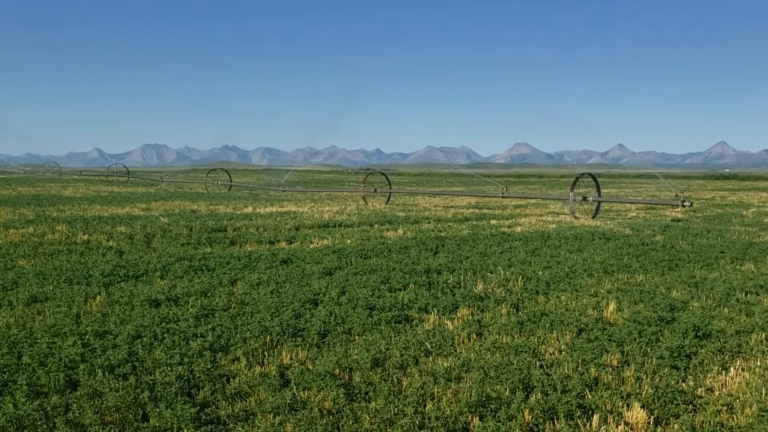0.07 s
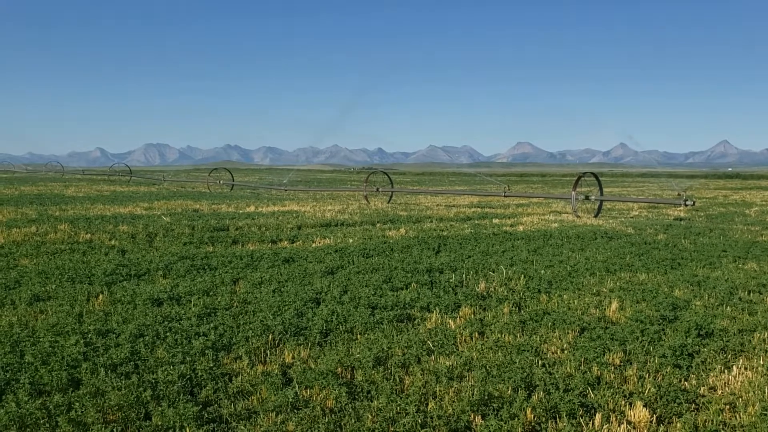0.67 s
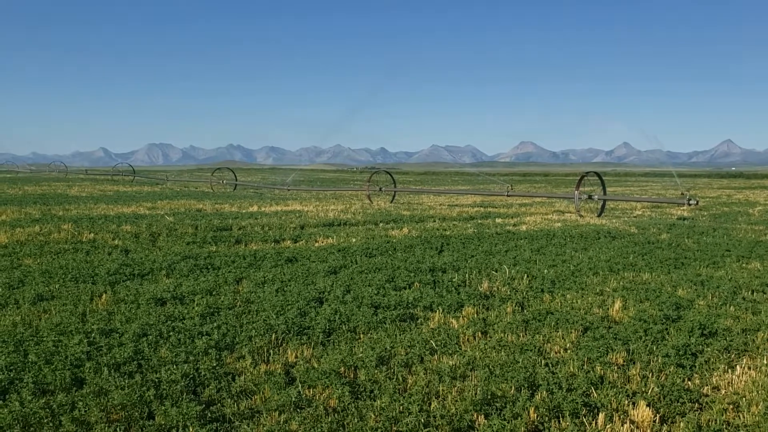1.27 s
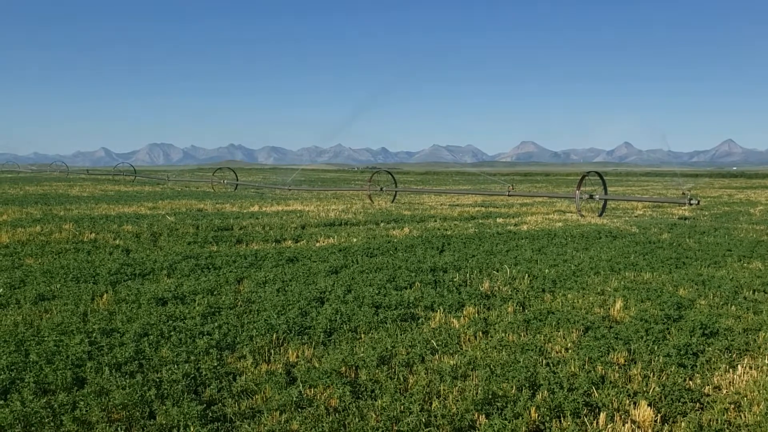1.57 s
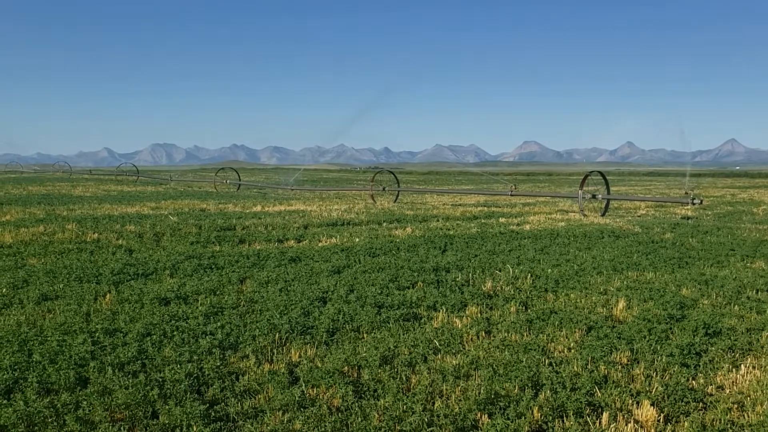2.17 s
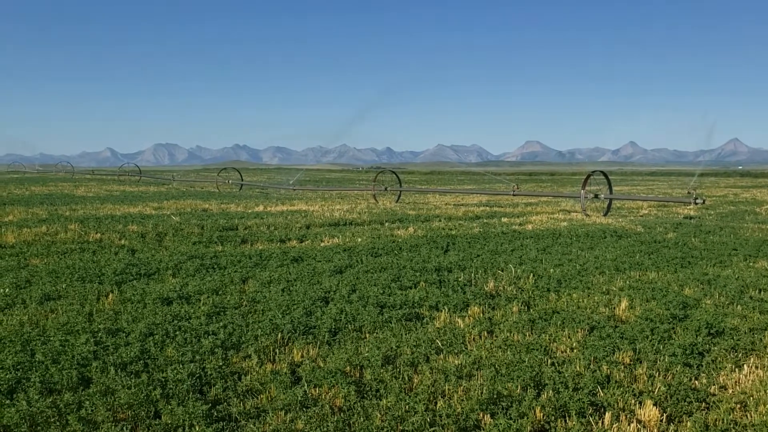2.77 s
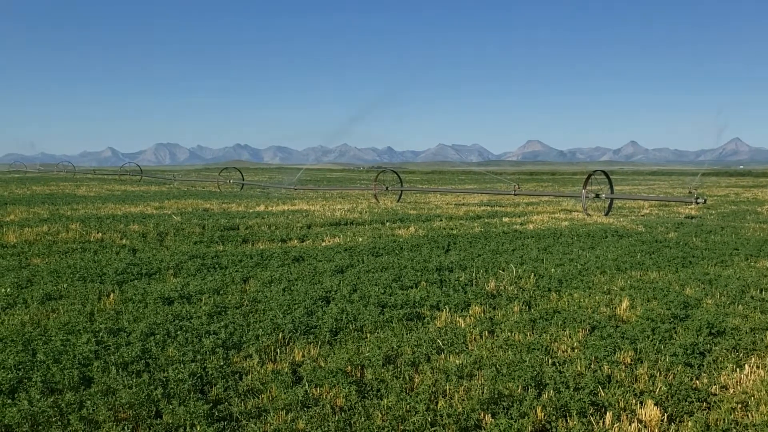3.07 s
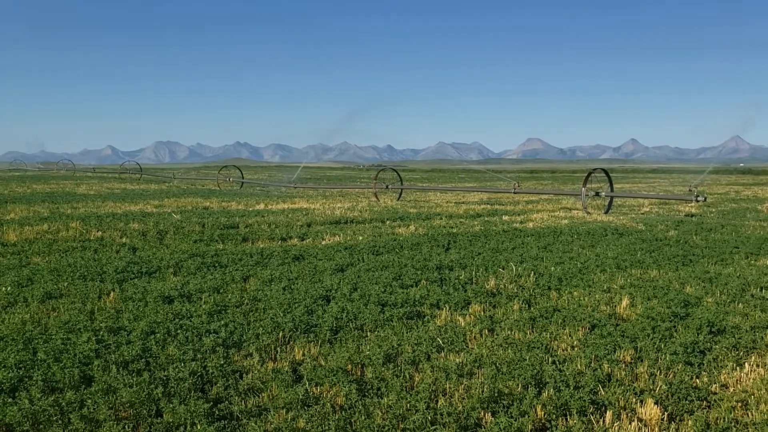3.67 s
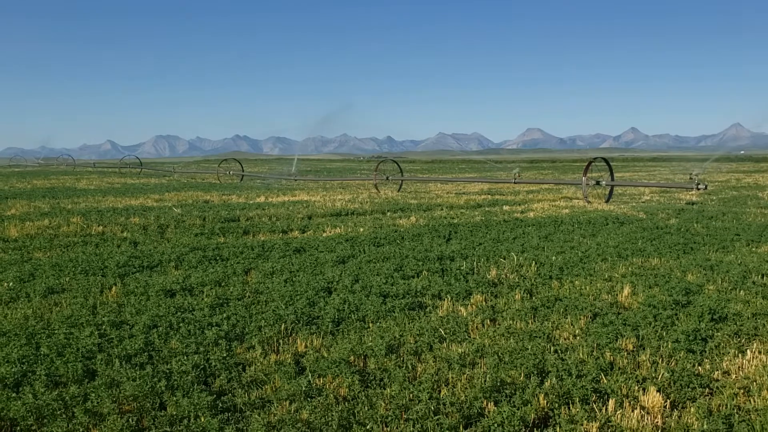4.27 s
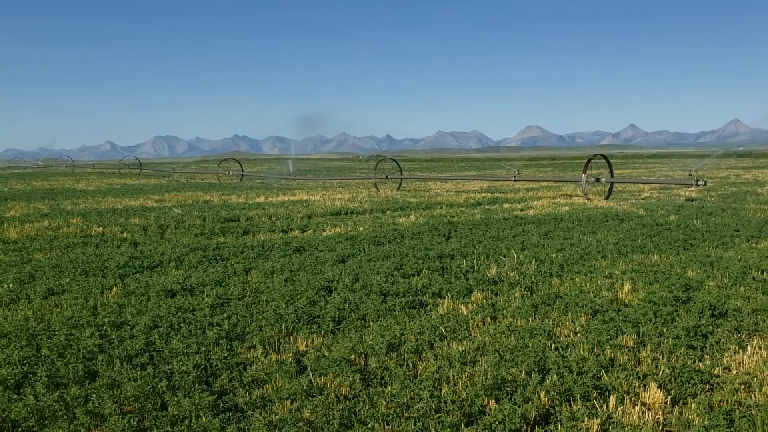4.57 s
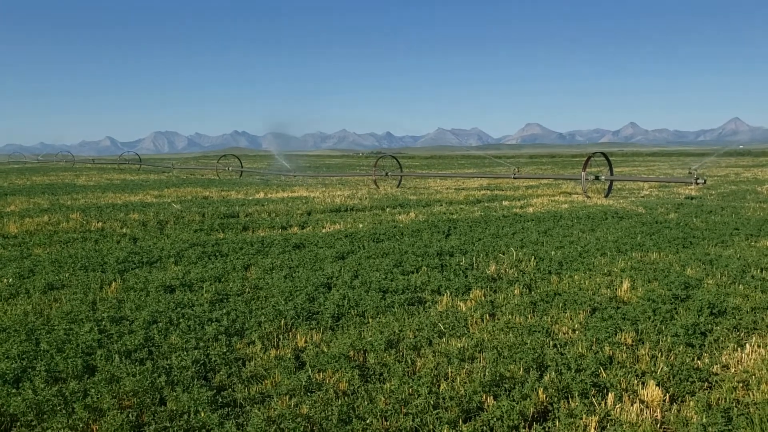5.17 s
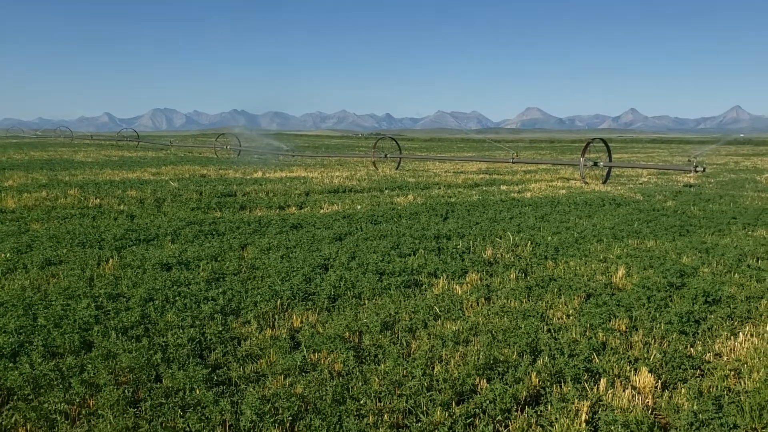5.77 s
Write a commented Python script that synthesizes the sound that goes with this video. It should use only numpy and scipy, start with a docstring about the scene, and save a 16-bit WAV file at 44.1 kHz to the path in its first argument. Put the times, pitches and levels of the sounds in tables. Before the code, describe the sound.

Impact sprinklers tick and spurt rapidly in overlapping rhythms across an open field, with a few light handling bumps.

```python
"""Five impact sprinklers spurt and tick along a wheel line in an open field, each at its own pace.
Each arm ticks as it enters its jet, which bursts into spray; pressure pulses ring the hollow feed pipe.
Behind them drops hiss down, a pump hums and a far bird whistles.
Later a finger knocks and rubs beside the right microphone port and light gusts buffet the camera."""
import sys
import numpy as np
from scipy import signal
from scipy.fft import rfft, irfft, next_fast_len
from scipy.io import wavfile
from scipy.ndimage import uniform_filter1d, map_coordinates

SR = 44100
rng = np.random.default_rng(int(sys.argv[2]) if len(sys.argv) > 2 else 0)


def materialize(psi):
    """Save the field psi as 16-bit PCM at rate SR to the path in sys.argv[1].

    A 1-D psi becomes a single channel; in a 2-D psi each row is a channel.
    """
    bounded = np.clip(np.atleast_2d(psi).T, -1, 1)
    quanta = np.round(bounded * 32767).astype(np.int16)
    wavfile.write(sys.argv[1], SR, quanta)


N = 261072

# Arm beat per head, nearest first: start_s, period_s
ARM_BEATS = [(.025, .2268), (.03, .2868), (.04, .26), (.015, .19), (.12, .2917)]
# Spurt and tick per head, relative levels:
# hiss_db, delay_s, rise_s, hold_s, tail_t60_s, nozzle_offset_db, tick_db, lean_db
SPRINKLER_HEADS = [(-42, 0.0036, 0.0072, 0.024, 0.075, -11.5, -45, -8),
                   (-46, .001, 0.0017, 0.028, 0.034, -11.5, -47.5, -5.5),
                   (-53, .001, 0.0016, .015, 0.086, -3.5, -42.5, -2),
                   (-54, 0.00052, 0.001, 0.017, 0.11, -2, -61, -5),
                   (-56, 0.00046, 0.00089, 0.021, 0.081, -6, -55, -2)]


def amp(db):
    """Decibels to gain."""
    return 10 ** (np.asarray(db) / 20)


def unit(x):
    """Scale to rms 1."""
    return x / np.sqrt(np.mean(x ** 2) + 1e-20)


def gain_at(spectrum, hz):
    """Gain from (freq_hz, level_db) points on a log frequency axis."""
    freq_hz, level_db = np.transpose(spectrum)
    return amp(np.interp(np.log(hz + 1), np.log(freq_hz + 1), level_db))


def clock():
    """Sample times in seconds."""
    return np.arange(N) / SR


def wobble(rate_hz):
    """Smooth random curve, rate_hz knots a second."""
    knots = rng.standard_normal(int(N * rate_hz / SR) + 4)
    return map_coordinates(knots, [np.arange(N) * rate_hz / SR])


def filtered(x, response):
    """Apply a frequency response."""
    size = next_fast_len(N + 8192)
    return irfft(rfft(x, size) * response(np.fft.rfftfreq(size, 1 / SR)), size)[..., :N]


def noise(spectrum):
    """Independent left and right shaped noise, rms 1."""
    return unit(filtered(rng.standard_normal((2, N)), lambda hz: gain_at(spectrum, hz)))


def ringing(size, hz, q):
    """Stereo noise in one resonance, rms 1."""
    resonance = signal.iirpeak(min(hz, SR / 3), max(q, .8), SR)
    return unit(signal.lfilter(*resonance, rng.standard_normal((2, size))))


def ports(x):
    """Each microphone port colours the treble its own way; rms 1."""
    # Port responses: freq_hz, gain_db
    left = [(1000, -8), (1750, -11), (2100, -9), (2550, 6), (2800, -20), (3200, 2.5), (4050, -24.5),
            (4600, -5.5), (5650, 6.5), (8000, 1.5), (10400, -8.5), (11400, 4.5), (12800, -2), (15500, 1)]
    right = [(1000, -4), (1750, -9.5), (2100, -6.5), (2800, 3), (4300, -10), (5100, -4), (6400, 3),
             (7800, 14.5), (8600, 0), (10400, 0), (12200, 2.5), (13600, 5), (14700, -24), (15700, 8.5)]
    return unit(filtered(x, lambda hz: np.array([gain_at(left, hz), gain_at(right, hz)])))


def pan(lean_db):
    """Stereo gains of mean power 1; lean_db is left over right."""
    return unit(amp([[lean_db / 2], [-lean_db / 2]]))


def add(track, start_s, sound):
    """Mix a sound in at start_s."""
    span = track[:, round(start_s * SR):][:, :sound.shape[-1]]
    span += sound[..., :span.shape[1]]


def pump(rumble_db=-69.0):
    """A pump's steady low orders over the rumble of the open field."""
    # Pump orders: pitch_hz, level_db
    orders = [(48.45, -60.5), (96.9, -57.5), (145.35, -79)]
    # Field rumble spectrum: freq_hz, density_db
    field = [(20, -22), (45, -10.5), (70, -3), (140, -8.5), (190, -16), (300, -23), (420, -33.5),
             (800, -26), (2000, -55)]
    drift_s = .00025 * wobble(3)
    t = clock() + drift_s
    hum = sum(amp(db + 0.62 * wobble(4.8)) * np.sqrt(2) * np.sin(2 * np.pi * hz * t)
              for hz, db in orders)
    air = noise(field)
    return pan(lean_db=-7) * hum + pan(lean_db=-4) * amp(rumble_db) * (air + 0.3 * air[::-1])


def wind():
    """Light gusts buffet the two ports unequally."""
    # Gusts: peak_s, sigma_s, level_db
    gusts = [(3.42, 0.023, -63), (3.81, 0.1, -63), (5.85, 0.12, -53)]
    # Buffeting spectrum: freq_hz, density_db
    buffet = [(20, -21), (60, 4), (150, -12.5), (280, -11), (600, -26), (2000, -65)]
    strength = sum(amp(db) * np.exp(-.5 * ((clock() - peak_s) / sigma_s) ** 2)
                   for peak_s, sigma_s, db in gusts)
    lumps = amp(4 * wobble(30))
    return strength * lumps * pan(lean_db=-6) * noise(buffet)


def bird(gain_db=4.0, arch_hz=210, waver_hz=22, blur=0.7):
    """Thin whistles arch in pitch and level, a little blurred by distance."""
    # Two whistles and a chirp: start_s, length_s, top_hz, relative_db
    whistles = [(0.549, 0.31, 3230, -74), (1.405, 0.42, 3340, -72), (2.677, 0.057, 3170, -69)]
    pitch_hz, level = np.zeros(N), np.zeros(N)
    for start_s, length_s, top_hz, db in whistles:
        progress = np.clip((clock() - start_s) / length_s, 0, 1)
        arch = np.sqrt(abs(np.sin(np.pi * progress ** 0.59)))  # up quickly, down slowly
        pitch_hz = np.where(clock() >= start_s, top_hz - arch_hz * (1 - arch), pitch_hz)
        level += amp(db + gain_db) * arch
    phase = 2 * np.pi * np.cumsum(pitch_hz + waver_hz * wobble(23)) / SR
    scatter = wobble(240) * np.sin(phase) + wobble(240) * np.cos(phase)
    fading = amp(1.5 * wobble(22))
    return level * fading * (np.sin(phase) + blur * scatter)


def falling_spray(patter_gain_db=1, flow_db=-68):
    """Drops patter on the crop while water rushes through the pipe."""
    # Patter swell: time_s, relative_db
    swell = [(0, -66), (2, -66), (3.6, -63.5), (4.3, -61.5), (4.7, -61.5), (5.9, -62.5)]
    # Patter spectrum: freq_hz, density_db
    drops = [(300, 2.5), (800, -9), (1100, -24), (2000, 2), (3200, 0.5), (4500, 2.5), (8000, -5),
             (12000, 5.5), (16000, -11)]
    patter_db = np.interp(clock(), *np.transpose(swell)) + patter_gain_db
    patter = amp(patter_db + wobble(8.3) + 1.9 * wobble(400)) * ports(noise(drops))
    flow = noise([(600, -53), (900, -5), (1110, 8.5), (1350, -6.5),
                  (1600, 6), (1850, 5.5), (2100, -28.5), (4000, -14)])
    return patter + amp(flow_db + wobble(6.4)) * pan(lean_db=-8.5) * flow


def rubs(scrape_gain_db=-3, hollow_gain_db=-2.33, grain_db=0.93):
    """Skin slides on the case: a grainy scrape, and the hollow under the finger rings."""
    # Finger slides: peak_s, sigma_s, relative_db, hollow_hz, scrape_offset_db
    slides = [(3.374, 0.022, -48.5, 457, 3), (3.446, 0.025, -40.5, 780, -6),
              (3.533, 0.017, -54.5, 594, -15), (3.672, 0.046, -54, 660, -2.5), (3.792, 0.025, -42, 597, -7),
              (3.897, 0.055, -63, 690, 7), (4.756, 0.013, -68.5, 444, 15), (4.853, 0.03, -45, 605, -4),
              (4.954, 0.031, -47.5, 630, 0), (5.181, 0.033, -53.5, 515, 0), (5.478, .029, -46, 500, 1),
              (5.606, .036, -39, 586, -4), (5.69, 0.022, -50, 680, 6.5), (5.746, 0.023, -37, 680, .5),
              (5.839, 0.035, -53.5, 403, 4), (5.914, 0.012, -40, 470, 6)]
    # Scrape spectrum: freq_hz, density_db
    rasp = [(60, -20), (200, -1.5), (400, -5), (900, -11), (1550, -4), (2300, -10.5), (2900, -9.5),
            (4000, -11), (5000, -11.5), (6400, -20), (7700, -12.5), (9500, -25), (12000, -14), (15500, -16)]
    hollows, scraping, t = np.zeros((2, N)), np.zeros((1, N)), np.arange(SR // 2) / SR
    case = signal.butter(2, [250, 1300], "bandpass", fs=SR)
    for peak_s, sigma_s, db, hollow_hz, scrape_offset_db in slides:
        envelope = amp(db) * np.exp(-.5 * ((t - t.mean()) / sigma_s) ** 2)
        ring = unit(signal.lfilter(*case, ringing(len(t), hollow_hz, q=2.2)))
        add(hollows, peak_s - t.mean(), envelope * ring)
        add(scraping, peak_s - t.mean(), envelope * amp(scrape_offset_db))
    scrape = amp(scrape_gain_db) * pan(lean_db=-15.5) * scraping * noise(rasp)
    hollow = amp(hollow_gain_db) * pan(lean_db=-52) * hollows
    return (scrape + hollow) * amp(grain_db * wobble(350) + wobble(60))


def knocks(crack_t60_s=0.0032, thump_hz=62, thump_db=-42, thump_t60_s=0.24):
    """Small dead knocks by the right port; the first firm one shakes the whole camera."""
    # Finger contacts: start_s, body_db, body_hz, decay_s, crack_db, crack_hz
    contacts = [(3.326, -48, 8200, 0.002, -36, 9000), (3.3337, -37, 5100, 0.0047, -32, 7000),
                (3.3353, -26, 332, 0.0019, -25.5, 5960), (3.3679, -20.5, 796, 0.0023, -29.5, 2200),
                (3.866, -40.5, 2240, 0.0015, -42.5, 3000), (5.322, -52, 4960, 0.0025, -42, 7000),
                (5.801, -31, 200, 0.0078, -52, 1000)]
    out, t = np.zeros((2, N)), np.arange(SR // 5) / SR
    for start_s, body_db, body_hz, decay_s, crack_db, crack_hz in contacts:
        age = np.log(1000) * t / decay_s
        push = age * np.exp(1 - age)  # soft contact: swells, then dies at once
        body = amp(body_db) * push * np.sin(2 * np.pi * body_hz * t)
        crack = amp(crack_db - 60 * t / crack_t60_s) * ringing(len(t), crack_hz, q=0.8)
        add(out, start_s, pan(lean_db=-21) * (body + crack))
    thump = amp(thump_db - 60 * t / thump_t60_s) * np.sin(2 * np.pi * thump_hz * t)
    add(out, contacts[2][0], thump)
    return out


def strokes(head):
    """Times in seconds at which one head's arm cuts its jet."""
    # Slow drift around the beat: time_s, then late_ms for heads 0-4
    drift = [(0, -6.5, -7.5, -0.2, -2.5, -4), (0.978, 2.1, -1, -.5, 7.5, 2.5), (1.97, 5, 7, -3.3, 9, 9),
             (2.948, 4.5, 1, -1.9, 9.5, -4), (3.931, 1, 9, -3, 5, -4), (4.921, -2.1, -10.5, -9, -9.5, 4),
             (5.9, -7, -22.5, -10, -27, 3)]
    time_s, *late_ms = np.transpose(drift)
    start_s, period_s = ARM_BEATS[head]
    beat_s = np.arange(start_s, N / SR, period_s)
    return beat_s + np.interp(beat_s, time_s, late_ms[head]) / 1000


def pipe(head=1, delay_s=0.0032, rise_s=0.013, t60_s=0.42, upper_hz=1720, lower_hz=1130, gain_db=2):
    """Each pressure pulse from one head rings two broad pipe resonances: a hollow chuff."""
    # Strongest chuffs: start_s, relative_db, upper_hz
    hard = [(.031, -66, 1590), (0.324, -65.5, 1820), (2.63, -68.5, 1810), (4.07, -64, 1750),
            (4.61, -68.5, 1730)]
    out, t = np.zeros((2, N)), np.arange(SR // 2) / SR
    usual_relative_db, half_beat_s = -69, ARM_BEATS[head][1] / 2
    usual = [(s + delay_s, usual_relative_db, upper_hz * rng.normal(1, 0.031)) for s in strokes(head)
             if all(abs(s - hard_s) > half_beat_s for hard_s, *_ in hard)]
    for start_s, db, hz in hard + usual:
        body = ringing(len(t), hz, q=7.1) + amp(-3) * ringing(len(t), lower_hz, q=12)
        envelope = amp(db + gain_db - 60 * t / t60_s) * (1 - np.exp(-t / rise_s))
        add(out, start_s, envelope * body)
    walls = [(500, -18), (850, 2.5), (1050, 3.5), (1900, 13), (2100, 4.5), (4000, 21)]
    return pan(lean_db=-7.5) * filtered(out, lambda hz: gain_at(walls, hz))


def slaps(t60_s=0.012, scatter_db=2.7, entry_s=0.001, drop_db=-58, drops_per_s=70):
    """Bright ticks: each arm ticks as it enters the jet, some much harder than the rest, and flung drops hit
    the pipe."""
    # Loudest arm-entry ticks, at set times: start_s, peak_db
    hard = [(.0427, -36), (.823, -43), (2.7501, -33.5), (2.9807, -39), (4.0596, -40), (4.113, -48)]
    strikes, t = np.zeros((2, N)), np.arange(SR // 20) / SR
    tick = amp(-60 * t / t60_s)
    for start_s, peak_db in hard:
        add(strikes, start_s, amp(peak_db) * tick)
    for head, (*_, tick_db, lean_db) in enumerate(SPRINKLER_HEADS):
        for start_s in strokes(head) + entry_s:
            strength = amp(tick_db + scatter_db * rng.standard_normal())
            add(strikes, start_s, strength * pan(lean_db) * tick)
    for when, size, side in rng.random((int(drops_per_s * N / SR), 3)):
        add(strikes, when * N / SR, amp(drop_db + 12 * size) * pan(12 * side - 7) * tick ** 4)
    return strikes * ports(noise([(1000, -11.5), (2500, -1), (5000, 1.5), (9000, 14), (16000, 10)]))


def patchy_colour(x, depth_db):
    """Each spurt's hiss has a slightly different, patchy colour."""
    spectra = signal.stft(x, nperseg=512)[2]
    patches = uniform_filter1d(rng.standard_normal(spectra.shape), size=7, axis=1)
    patches = uniform_filter1d(patches, size=12, axis=2)
    return signal.istft(spectra * amp(depth_db * unit(patches)), nperseg=512)[1][:, :N]


def spurts(scatter_db=1.05, soften_db=-2, colour_db=1.55, flutter_db=1.63,
           nozzle_gain_db=1.5, tsk_gain_db=5):
    """The jet bursts on the arm, holds while the arm is in it, and trails off as droplets."""
    # Spray, nozzle band and narrow "tsk" spectra: freq_hz, density_db
    hiss_band = [(3000, -22), (5500, -3.5), (6600, -6), (10000, 6.5), (16000, -1.5)]
    nozzle_band = [(300, -50), (800, -22), (1100, 3.5), (2000, -9), (3200, -2), (4200, 4.5), (5000, 3),
                   (6000, -0.5), (7000, -2.5), (10000, -59)]
    tsk_band = [(3900, -35), (4600, -4), (5000, 0), (5650, -2.5), (6200, -29), (7500, -32)]
    # Nearest head swinging round: time_s, gain_db, facing (0-1)
    swing = [(0, -0.5, 0), (.7, -3, 0.04), (1.4, 2, 0.09), (2.3, 0.5, 0.07), (2.9, 1.5, 0), (3.6, 1, 0.57),
             (4.4, 6.5, 0.62), (5.1, 5, 0.64), (5.9, 1, .95)]
    swing_s, swing_db, swing_facing = np.transpose(swing)
    hiss_power, nozzle_power, tsk_power = np.zeros((3, 2, N))
    t = np.arange(SR // 5) / SR
    for head, row in enumerate(SPRINKLER_HEADS):
        hiss_db, delay_s, rise_s, hold_s, t60_s, nozzle_offset_db, _, lean_db = row
        shape = (1 - np.exp(-t / rise_s)) * amp(hiss_db - 60 * np.maximum(t - hold_s, 0) / t60_s)
        nearest = head == 0
        for start_s in strokes(head) + delay_s:
            size, colour = rng.standard_normal(2)
            spurt = shape * amp(nearest * np.interp(start_s, swing_s, swing_db) + scatter_db * size)
            band_power = (amp(nozzle_offset_db + colour_db * colour) * spurt) ** 2
            # Facing the listener, the hiss softens and the nozzle band narrows to a "tsk".
            facing = nearest * np.interp(start_s, swing_s, swing_facing)
            add(hiss_power, start_s, (pan(lean_db) * amp(facing * soften_db) * spurt) ** 2)
            add(nozzle_power, start_s, (1 - facing) * band_power)
            add(tsk_power, start_s, facing * band_power)
    hiss = np.sqrt(hiss_power) * np.array([unit(side) for side in ports(noise(hiss_band))])
    nozzle = amp(nozzle_gain_db) * np.sqrt(nozzle_power) * ports(noise(nozzle_band))
    tearing = amp(flutter_db * wobble(220) + wobble(1300) - 1.5)  # the jet breaks up unevenly
    jets = patchy_colour(hiss + nozzle, depth_db=3.5)
    tsk = amp(tsk_gain_db) * np.sqrt(tsk_power) * noise(tsk_band)
    return tearing * (jets + tsk)


def scene():
    """Open ground: nothing echoes."""
    sprinklers = spurts() + slaps() + pipe() + falling_spray()
    return sprinklers + pump() + bird() + rubs() + knocks() + wind()


def record(dry, top_hz=15850):
    """The camera passes nothing above its band limit."""
    return filtered(dry, lambda hz: hz < top_hz)


dry = scene()
out = record(dry)
materialize(out)
```